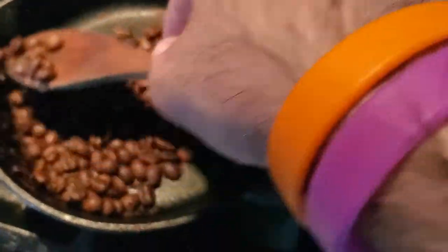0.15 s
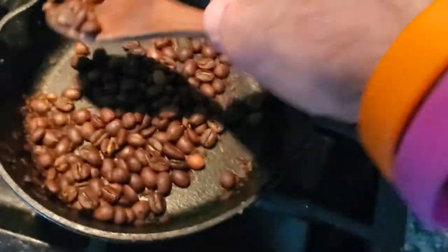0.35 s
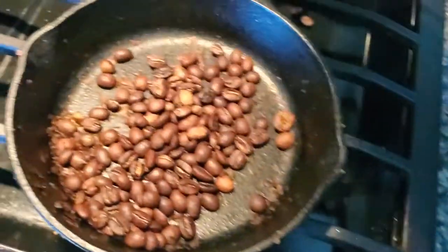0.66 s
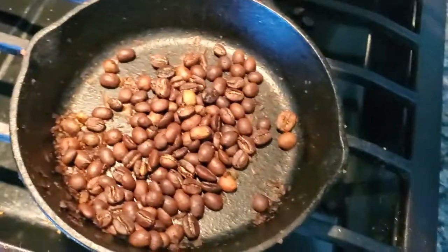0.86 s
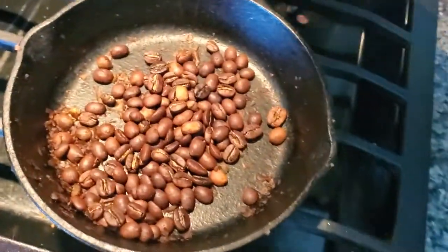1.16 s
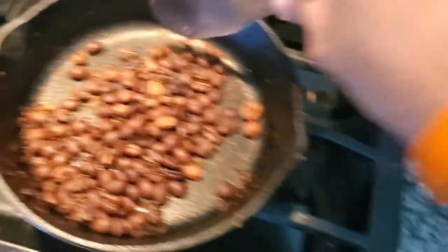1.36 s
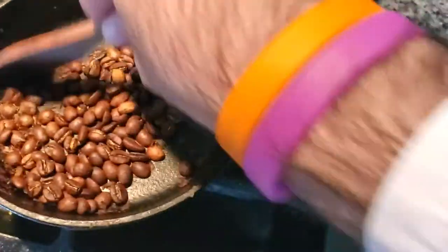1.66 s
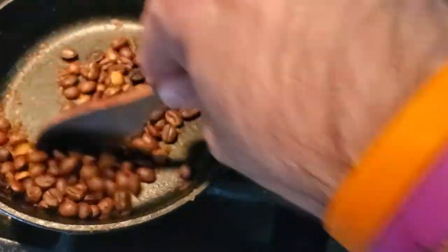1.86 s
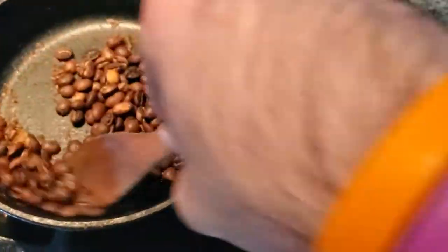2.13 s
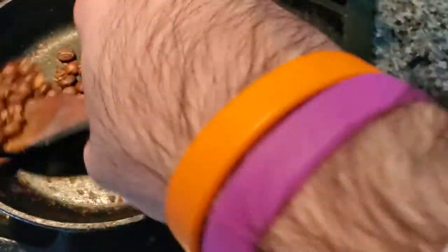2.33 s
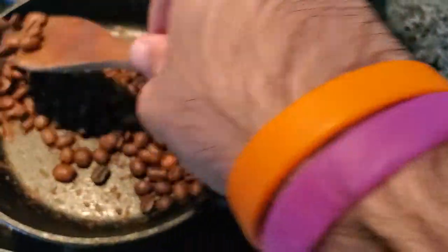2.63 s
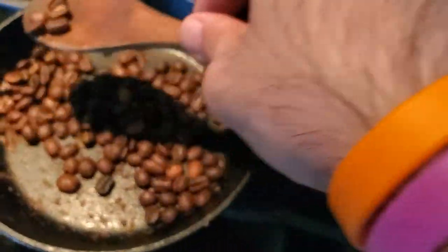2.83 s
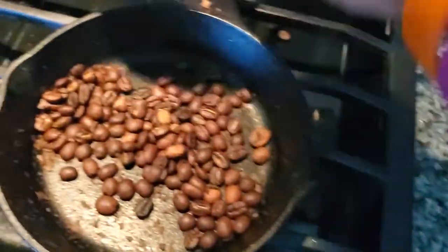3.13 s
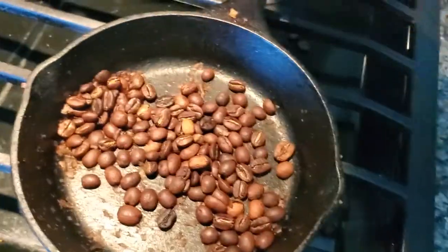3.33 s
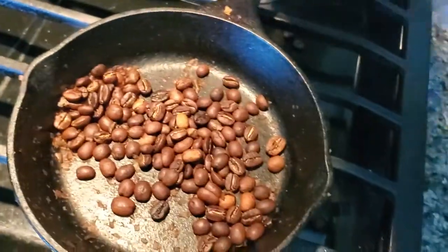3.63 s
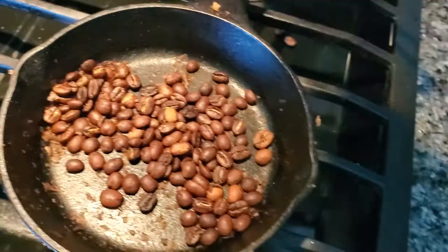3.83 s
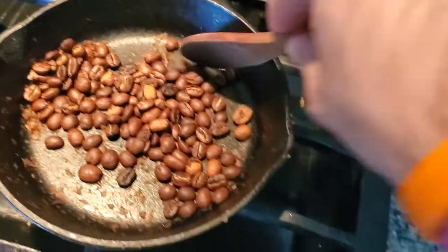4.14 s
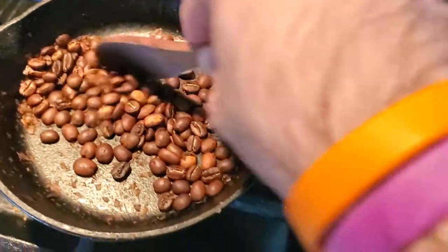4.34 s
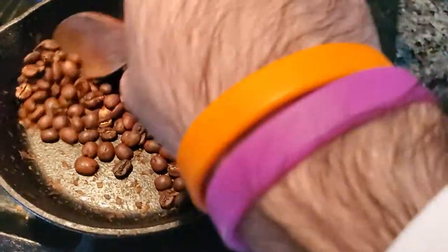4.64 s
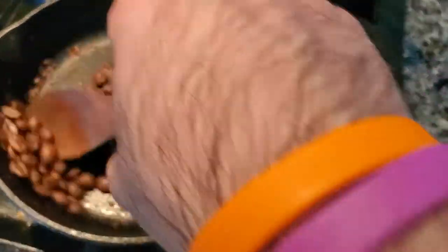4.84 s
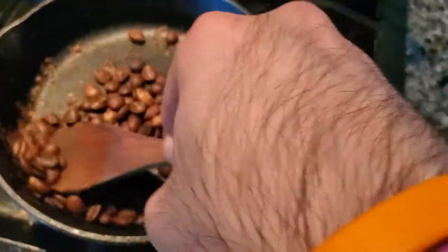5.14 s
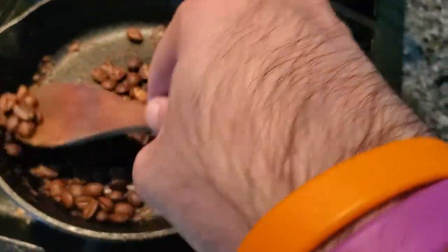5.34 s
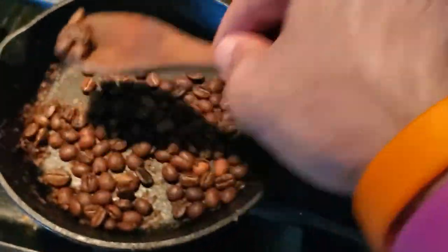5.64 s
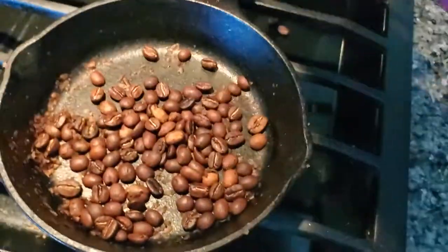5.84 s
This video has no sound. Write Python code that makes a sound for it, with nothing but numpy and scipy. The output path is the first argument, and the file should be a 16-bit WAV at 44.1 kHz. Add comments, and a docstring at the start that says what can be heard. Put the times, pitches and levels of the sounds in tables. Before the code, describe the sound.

Close stereo sound of coffee beans stirred in a cast iron pan on a kitchen stove. A faint trickle of beans opens, then a wooden tool clatters quickly on the metal grate. A strong stir follows with dense rattling, scraping and knocks, fading into loose bean ticks. After a pause and another clatter, a second shorter stir comes, over faint hum, low room noise and airy hiss.

```python
"""Stirring coffee beans in an iron pan

A wooden spatula scrapes and knocks in a cast iron pan: beans are clumps of short pings, dragging is
shaped noise, and knocks are decaying noise bursts that excite the damped resonant modes of the pan.
Between strokes the spatula clatters against the iron grate, which has shorter modes of its own.
Sparse reflections follow; room noise, a wavering hum and a faint treble hiss lie underneath."""
import sys
import numpy as np
from scipy import signal
from scipy.io import wavfile
from scipy.ndimage import uniform_filter1d

SR = 44100
rng = np.random.default_rng(int(sys.argv[2]) if len(sys.argv) > 2 else 0)


def nominal_scale(level):
    """Amplitude ratio for a level in decibels (scalar or array-like)."""
    x = np.asarray(level, float) / 20
    return 10 ** x


def transcribe(signal):
    """Save signal, clipped to [-1, 1], as a 16-bit WAV file at the path in sys.argv[1]."""
    frames = np.atleast_2d(signal).T
    limited = np.clip(frames, -1, 1)
    pcm = np.round(limited * 32767).astype(np.int16)
    wavfile.write(sys.argv[1], SR, pcm)


N = 263718  # length in samples

# Spectrum of the low room noise. Each row: frequency in Hz, relative density in dB per Hz.
ROOM_SPECTRUM = [(12, -52), (20, -31), (48, -1.5), (185, -9), (209, -11.5), (242, -0.5), (332, -14),
                 (384, -3), (784, -15), (1120, -26), (2590, -45), (3000, -38.5), (3900, -77.5),
                 (6600, -120)]
# Partials of the hum. Each row: frequency in Hz, relative level in dB.
HUM_PARTIALS = [(59.2, -66), (120.0, -66), (240.5, -69), (483.0, -77)]
# Swelling and sinking of the treble hiss. Each row: time in seconds, level in dB.
HISS_SWELL = [(0, -60), (.4, -79), (.7, -70), (.95, -56), (1.2, -59.5), (1.4, -80.5), (2.5, -69),
              (3.1, -83.5), (3.45, -62), (3.8, -68.5), (4.1, -79), (5.1, -62), (5.65, -83), (5.98, -68.5)]
# Spectrum of the treble hiss. Each row: frequency in Hz, relative density in dB per Hz.
HISS_SPECTRUM = [(880, -42), (1500, -19), (2090, -4), (3970, -0.5), (7250, -3.5), (8260, 1), (15100, 1),
                 (16000, 7), (16500, -24)]
# Left-right likeness of the noises. Each row: frequency in Hz, correlation from 0 to 1.
LIKENESS = [(30, 0.74), (250, 0.9), (600, 0.46), (2000, 0.043), (16000, .2)]
# Spatula bounces on the grate. Each row: start in seconds, dull crack in relative dB,
# bright crack in relative dB, decay constant of the crack in seconds.
GRATE_BOUNCES = [(0.956, -60, -75, 0.004), (0.9865, -14.5, -27, 0.011), (0.9907, -31.5, -17, 0.0051),
                 (1.009, -22.5, -22, 0.0081), (1.0216, -13, -22, 0.0015), (1.068, -29, -30, 0.018),
                 (1.0745, -28, -22, 0.008), (1.087, -41, -27.5, 0.019), (1.11, -30, -30.5, 0.0083),
                 (1.3603, -45, -72, 0.07), (3.4985, -29, -27, 0.015), (3.5352, -16, -22, 0.0097),
                 (3.553, -26, -13, 0.003), (3.599, -30.5, -46, 0.0057), (3.6217, -26.5, -39, 0.035),
                 (3.825, -52, -72, 0.02), (4.0, -68, -85, 0.04)]
# Modes of the grate. Each row: frequency in Hz, relative level in dB, decay by 60 dB in seconds.
GRATE_MODES = [(1920, -9, .03), (1650, -19, .02), (3350, -12, .02), (3700, -6, .02), (3815, -2, .03),
               (3880, -6, .045), (4000, -6, .02), (6045, -12, .05), (6700, -6, .02), (8400, -8, .015),
               (7600, -8, .02), (10850, -4, .015), (11310, -6, .025), (11640, -6, .02), (12700, -4, .012)]
# The blade dragging on the bottom, one list a passage. Each row: time in seconds,
# scrape rumble in dB, deep shudder of the stove in dB.
DRAG_STROKES = [
    [(.06, -72, -70), (.1, -56, -57), (.14, -66, -66), (.25, -63, -64), (.3, -72, -72)],
    [(1.43, -75, -66), (1.466, -47, -62), (1.52, -47, -57), (1.66, -47, -56), (1.78, -52, -66),
     (1.9, -55, -54), (1.96, -49, -60), (2.07, -55, -54), (2.168, -47, -54), (2.234, -50, -61),
     (2.312, -48, -56), (2.5, -68, -60), (2.65, -63, -56), (2.75, -70, -66)],
    [(4.12, -72, -70), (4.18, -49, -60), (4.3, -52, -62), (4.5, -66, -66), (4.562, -51, -60),
     (4.65, -46, -62), (4.776, -50, -55), (4.864, -58, -58), (5.1, -68, -66)],
]
# Spectrum of wood dragged over iron. Each row: frequency in Hz, relative density in dB per Hz.
SCRAPE_SPECTRUM = [(150, -22), (240, -2), (280, -5), (330, 1), (420, -5), (485, 1), (560, -4), (775, -9),
                   (1500, -14), (1950, -42), (3300, -120)]
# Spectrum of the stove's shudder. Each row: frequency in Hz, relative density in dB per Hz.
SHUDDER_SPECTRUM = [(25, -16), (60, 0), (120, -5), (160, -25), (400, -90)]
# Spatula strokes, one list a stroke. Each row: time in seconds, push of the spatula through
# the heap in relative dB, loose beans rolling in relative dB.
STIR_STROKES = [
    [(0, -83, -59.5), (0.08, -65, -59), (0.14, -73, -57.5), (0.22, -69, -64.5), (0.3, -78, -65.5),
     (0.4, -90, -85), (0.45, -105, -70), (0.6, -92, -97)],
    [(1.44, -67, -91), (1.47, -49, -53), (1.55, -47, -52.5), (1.65, -41, -44), (1.695, -60, -58)],
    [(1.695, -36.5, -52), (1.76, -39.5, -39), (1.88, -48.5, -34.5), (1.95, -41.5, -35), (2.09, -51, -46.5),
     (2.16, -42, -37.5), (2.24, -48.5, -48.5), (2.36, -51, -43), (2.43, -71, -54.5)],
    [(2.43, -72, -62), (2.58, -83, -56), (2.63, -76, -42), (2.68, -80, -55.5), (2.74, -75, -44.5),
     (2.79, -74, -53), (2.85, -87, -50), (3.0, -73, -61.5), (3.1, -90.5, -97)],
    [(4.14, -70.5, -98.5), (4.2, -49, -62), (4.27, -56, -46), (4.31, -37.5, -36), (4.36, -56.5, -45.5),
     (4.43, -74, -71), (4.54, -68, -53.5)],
    [(4.54, -80, -64), (4.56, -44.5, -46), (4.67, -50, -51), (4.75, -45, -44), (4.83, -56, -54.5),
     (4.9, -60.5, -56), (4.99, -52, -60), (5.06, -72, -71), (5.12, -63, -70), (5.18, -68, -72)],
    [(5.18, -78, -63.5), (5.34, -91, -73.5), (5.45, -77.5, -54.5), (5.53, -80.5, -81.5), (5.65, -92, -92)],
]
# Single ticks and knocks in the pan. Each row: start in seconds, dull crack in relative dB,
# bright crack in relative dB, ring in relative dB.
PAN_KNOCKS = [(0.0252, -64, -43, -60.5), (0.1257, -31, -50, -58), (0.1439, -60, -38, -63.5),
              (0.178, -62, -42, -62), (0.193, -56, -37, -59.5), (0.2164, -59, -37, -55),
              (0.258, -61, -41, -58), (0.286, -64, -45, -64), (0.325, -52, -50, -60),
              (0.4405, -66, -52, -68), (1.4475, -48.5, -24, -50.5), (1.4604, -33, -36.5, -10.5),
              (1.575, -23, -36, -25), (1.5909, -26, -41.5, -29), (1.6327, -22.5, -48.5, -37.5),
              (1.701, -16, -22, -37.5), (1.7044, -17.5, -18, -36), (1.712, -19.5, -25.5, -35),
              (1.751, -23.5, -44, -34), (1.7905, -22, -30.5, -29), (1.8687, -18, -30.5, -37),
              (1.934, -40.5, -24.5, -45), (1.9473, -19.5, -24, -21.5), (2.0167, -13.5, -23.5, -35.5),
              (2.028, -35.5, -32.5, -33), (2.0668, -6, -29, -28.5), (2.3099, -49, -29, -55),
              (2.4562, -36, -42, -42), (2.5171, -34, -42, -54.5), (2.551, -58, -44, -55),
              (2.59, -55, -40, -58), (2.603, -32.5, -36, -42), (2.6863, -44, -32, -40),
              (2.72, -56, -38, -55), (2.795, -50, -30, -43), (4.146, -41, -34, -53), (4.1789, -7, -35, -14),
              (4.2886, -22, -29, -32), (4.4085, -27.5, -41, -33), (4.551, -22, -39.5, -33),
              (4.559, -13.5, -38, -30), (4.5761, -14.5, -49, -46), (4.6, -17, -39.5, -37),
              (4.6284, -21.5, -37, -27), (4.7009, -33, -35, -38), (4.9131, -38, -50, -58),
              (4.9605, -36, -50, -58), (4.9725, -34, -48, -58), (5.0289, -38, -55, -62),
              (5.1062, -48, -60, -66), (5.1955, -62, -50, -64), (5.3187, -50, -64, -68),
              (5.3586, -56, -52, -68), (5.4274, -58, -44, -62), (5.2254, -64, -52, -58),
              (5.3873, -35, -46, -57), (5.5132, -63.5, -44, -81)]
# Modes of the pan. Each row: frequency in Hz, relative level in dB, undamped decay by 60 dB in seconds.
PAN_MODES = [(482, -19, .15), (904, -22, .12), (1533, -12.5, .24), (1652, -8, .08), (2512, -8, .9),
             (3089, -.5, .17), (3103, -3, .17), (3161, -12, .3), (3885, -3.5, .13), (4727, 1.5, .18),
             (5160, -13, .1), (5338, -3, .16), (5810, -5, .13), (6405, -4, .15), (6990, -2, .14),
             (7212, -5, .2), (7800, -9, .1), (8090, -6, .09), (9000, -5, .16), (9350, -8, .15),
             (9660, -8, .12), (10900, -12, .08), (11310, -11, .1)]


def evened(x):
    """Normalisation: scales a signal to an rms of 1."""
    return x / np.sqrt(np.mean(x ** 2) + 1e-20)


def read(points, hz):
    """Interpolation: reads a spectrum table on a logarithmic frequency axis."""
    f, value = np.transpose(points)
    return np.interp(np.log(hz + 1), np.log(f + 1), value)


def band(x, lo_hz, hi_hz):
    """Causal band-pass: a Butterworth filter keeps one frequency range."""
    edges = [lo_hz, min(hi_hz, SR * .45)]
    return signal.sosfilt(signal.butter(2, edges, "band", fs=SR, output="sos"), x)


def place(x, db, count):
    """Stereo localisation: louder on the left by db, and earlier there by count samples."""
    sides = nominal_scale([db / 2, -db / 2])[:, None]
    return sides * [x[0], np.roll(x[1], count)]


def noise(spectrum, patchy_db, near=0):
    """Random-phase synthesis: short-time spectra with drifting patches give stereo noise of rms 1."""
    hz = np.fft.rfftfreq(1024, 1 / SR)
    a, b, c, d, patches = rng.standard_normal((N // 512 + 3, 513, 5)).T
    patches = uniform_filter1d(patches, size=8, axis=0)  # over frequency
    patches = evened(uniform_filter1d(patches, size=5, axis=1))  # over time
    same = np.clip(near + (1 - near) * read(LIKENESS, hz), -1, 1)[:, None]
    left = a + 1j * b
    right = same * left + np.sqrt(1 - same ** 2) * (c + 1j * d)
    z = np.array([left, right]) * nominal_scale(read(spectrum, hz)[:, None] + patchy_db * patches)
    return evened(signal.istft(z, window="cosine", nperseg=1024, noverlap=512)[1][:, :N])


def room():
    """Broadband ambience: steady low noise shaped by its spectrum."""
    return nominal_scale(-58) * noise(ROOM_SPECTRUM, patchy_db=1.5)


def hum():
    """Superposition of partials: each sine wavers slowly in level and phase."""
    t = np.arange(N) / SR
    total = np.zeros(N)
    for hz, db in HUM_PARTIALS:
        waver = np.interp(t, np.linspace(0, t[-1], 50), rng.standard_normal(50))
        total += nominal_scale(db + 3.5 + 2.2 * waver) * np.sin(2 * np.pi * hz * t + 0.6 * waver)
    return total


def hiss():
    """Amplitude modulation: a slow envelope makes treble noise swell and sink."""
    envelope = nominal_scale(np.interp(np.arange(N) / SR, *np.transpose(HISS_SWELL)))
    return envelope * noise(HISS_SPECTRUM, patchy_db=4.0)


def background():
    """Superposition of independent sources: room noise and hum, slightly to the left, and the hiss."""
    return place(hum() + room(), 1.3, count=0) + hiss()


def kitchen(x):
    """Reverberation: sparse reflections, other ones for each port, lasting longest near 4 kHz."""
    taps = np.zeros((2, SR // 2))
    grid = np.arange(60, SR // 2 - 20, 20)
    at = grid + rng.integers(0, 20, (2, len(grid)))
    np.put_along_axis(taps, at, rng.choice([-1., 1.], at.shape), 1)
    hz, t, z = signal.stft(taps, SR, nperseg=256)
    t60 = read([(500, 0.13), (4000, 0.33), (14000, 0.16)], hz)[:, None]  # Hz, seconds
    tail = signal.istft(z * nominal_scale(-60 * t / t60), SR, nperseg=256)[1]
    tail = tail / np.linalg.norm(tail[0])
    return signal.fftconvolve(x.mean(0)[None], tail, axes=1)[:, :N]


def mode(push, hz, t60, grip):
    """Damped resonance: one complex pole, run block by block, decays faster where grip exceeds 1."""
    touch_s, grip_hz = 0.0015, 4530  # the ring builds up over the contact; grip damps less below grip_hz
    touch = np.hanning(round(touch_s * SR))
    contact = touch / touch.sum() * np.exp(2j * np.pi * hz * np.arange(len(touch)) / SR)
    push = signal.oaconvolve(push, contact)[:N]
    decay = np.log(1000) / max(t60, .02)
    state, out = [0j], []
    for part, hold in zip(np.array_split(push, len(grip)), grip):
        damping = (1 + (hold - 1) * min(hz / grip_hz, 1) ** 2) * decay
        pole = np.exp((2j * np.pi * hz - damping) / SR)
        tone, state = signal.lfilter([1], [1, -pole], part + 0j, zi=state)
        out.append(tone)
    return np.concatenate(out)


def ring(modes, s, low_db, high_db, drive, grip, spread_db, turn, corner_hz, soft_db):
    """Modal excitation: each blow lands on its own spot and wakes modes unevenly; drive shakes them all."""
    wander_depth_db, wander_per_s = 4.5, 20  # the response of each mode to the drive wanders
    out, at = np.zeros((2, N)), np.round(s * SR).astype(int)
    spot = spread_db * rng.standard_normal((len(at), len(modes)))
    for (hz, db, t60), spot_db in zip(modes, spot.T):
        hard = hz ** 2 / (hz ** 2 + corner_hz ** 2)  # high modes follow high_db, low modes low_db
        knots = rng.standard_normal(200)
        wander = np.interp(np.arange(N) / SR * wander_per_s, np.arange(len(knots)), knots)
        push = np.roll(drive, rng.integers(-200, 200))
        push = push * nominal_scale(wander_depth_db * wander + (1 - hard) * soft_db)
        np.add.at(push, at, nominal_scale((1 - hard) * low_db + hard * high_db + spot_db))
        angle = turn * rng.choice([-1, 1])  # a mode reaches the two ports with different phase
        tone = nominal_scale(db) * mode(push, hz, t60, grip)
        out += np.cos(angle) * tone.imag + np.sin([[angle], [-angle]]) * tone.real
    return out


def cracks(s, db, bright_db, length):
    """Impact noise: exponentially decaying bursts in two trains, partly unlike at the two ports."""
    body, bright = np.zeros((2, 2, N + 4096))
    t = np.arange(4096) / SR
    for k, start in enumerate(np.round(s * SR).astype(int)):
        near, left, right = rng.standard_normal((3, 4096)) * np.exp(-t / max(length[k], 1e-4))
        own = np.array([left, right])
        body[:, start:start + 4096] += nominal_scale(db[k]) * (near + 0.034 * own)
        bright[:, start:start + 4096] += nominal_scale(bright_db[k]) * (near + 1.6 * own)
    return body[:, :N], bright[:, :N]


def grate():
    """Repeated impact: each bounce of the spatula is a dense chatter that rings the bars."""
    s, db, bright_db, length = np.transpose(GRATE_BOUNCES)
    body, chatter = cracks(s, db, bright_db, length)
    body, chatter = band(body, 1650, 7100), band(chatter, 7000, 16000)
    drive = nominal_scale(-27.0) * (body + chatter).mean(0)
    bars = ring(GRATE_MODES, s, db - 7.0, bright_db - 6.0, drive, [1],
                spread_db=2.5, turn=0.7, corner_hz=6500, soft_db=-.3)
    return place(bars + nominal_scale(-15) * body + chatter, -2.5, count=1)


def strokes(table):
    """Envelope interpolation: the columns of a stroke table at every sample in dB, silent between."""
    t, out = np.arange(N) / SR, np.full((2, N), 1e-8)
    for rows in table:
        s, *columns = np.transpose(rows)
        inside = (t >= s[0]) & (t < s[-1])
        out[:, inside] = nominal_scale([np.interp(t[inside], s, c) for c in columns])
    return 20 * np.log10(np.abs(uniform_filter1d(out, size=200, axis=1)) + 1e-8)


def drag():
    """Sliding friction: the blade on the bottom gives a scrape rumble and a deep shudder of the stove."""
    rumble, shudder = nominal_scale(strokes(DRAG_STROKES))
    scrape = rumble * noise(SCRAPE_SPECTRUM, patchy_db=2.0, near=.6)
    return scrape + shudder * noise(SHUDDER_SPECTRUM, patchy_db=1.5, near=.7)


def pan_knocks():
    """Impact spectrum: light knocks are single beans and crack higher; heavy ones are wood on iron."""
    s, db, bright_db, ring_db = np.transpose(PAN_KNOCKS)
    light = 1 / (1 + np.exp((db + 28) / 5))  # share of power: half at -28 dB, with a 5 dB span
    body, snap = cracks(s, db + 10 * np.log10(1 - light), bright_db, np.full(len(s), .0013))
    tick, heavy = cracks(s, db + 10 * np.log10(light), ring_db, np.full(len(s), .0025))
    knocks = nominal_scale(4.0) * band(body, 1920, 4200) + nominal_scale(.6) * band(snap, 5000, 22000)
    knocks += nominal_scale(3.0) * band(tick, 3300, 5400)
    thud = nominal_scale(-7.0) * band(body, 950, 2200) + nominal_scale(-12.0) * band(heavy.mean(0), 300, 1900)
    return knocks + thud


def sloped(db, slope, offset_db):
    """Power law: scales a level about a pivot of -50 dB, then offsets it, and returns the gain."""
    return nominal_scale(-50 + slope * (db + 50) + offset_db)


def heap_gain(push_db):
    """Granular agitation: pushing the heap sets the gain of the dull rattle."""
    return nominal_scale(push_db - 3)


def pan_ring():
    """Forced and struck vibration: rolling beans and knocks ring the iron, and the moving heap damps it."""
    push_db, roll_db = strokes(STIR_STROKES)
    s, _, bright_db, ring_db = np.transpose(PAN_KNOCKS)
    rattle = heap_gain(push_db)
    rolling = sloped(roll_db, 0.96, -22)
    sizes = nominal_scale(3.47 * np.minimum(rng.exponential(1, N), 4))
    grit = sizes * (rng.random(N) < 600 / SR) * rng.choice([-1, 1], N)  # about 600 impulses per second
    grip = 1 + np.minimum(rattle[::2048] / nominal_scale(-53), 4.5)
    drive = rolling * evened(grit) / (1 + rattle / nominal_scale(-47.0))  # the heap also muffles the rolling
    return ring(PAN_MODES, s, ring_db - 8.0, bright_db - 6.5, drive, grip,
                spread_db=4.5, turn=0.3, corner_hz=4420, soft_db=-7.0)


def scatter(s, db):
    """Exponential relaxation: beans thrown up by each knock settle again."""
    scatter_db, settle_s = -15.5, 0.02
    kicks = np.zeros(N)
    np.add.at(kicks, np.round(s * SR).astype(int), nominal_scale(db + scatter_db))
    return signal.lfilter([1], [1, -np.exp(-1 / (SR * settle_s))], kicks)


def collisions(level, clumps, lo_hz, hi_hz, per_s, spread_db, cycles):
    """Random point process: clumped short pings of eight pitches, most small and a few large."""
    out, t = np.zeros((2, N)), np.arange(300) / SR
    size = nominal_scale(spread_db * np.minimum(rng.exponential(1, N), 4))
    size = size * (rng.random(N) < clumps * per_s / SR)
    kind = rng.integers(0, 8, N)
    for k, hz in enumerate(np.geomspace(lo_hz, hi_hz, 8)):
        ping = evened(np.cos(2 * np.pi * hz * t) * t * np.exp(-t * hz / cycles))  # soft start
        clicks = signal.oaconvolve(size * (kind == k), ping)[:N]
        out += place([clicks, clicks], 4 * rng.standard_normal(), count=rng.integers(-3, 4))
    return level * evened(out)


def beans():
    """Granular collision: the pushed heap rattles dully and crunches, loose beans rattle brightly."""
    push_db, roll_db = strokes(STIR_STROKES)
    s, _, bright_db, _ = np.transpose(PAN_KNOCKS)
    rattle = heap_gain(push_db)
    bright = sloped(roll_db, 0.94, -9) + scatter(s, bright_db)
    clumps = nominal_scale(5.2 * evened(uniform_filter1d(rng.standard_normal(N), size=500)))
    low = collisions(rattle, clumps, 2300, 4800, per_s=1300, spread_db=3.5, cycles=0.48)
    high = collisions(bright, clumps, 9500, 14500, per_s=3800, spread_db=4.0, cycles=1.2)
    crunch = collisions(rattle * nominal_scale(-3.5), clumps, 4900, 7600, per_s=1800, spread_db=5.0, cycles=1.6)
    return low + high + crunch


def pan():
    """Superposition at the pan: ring, knocks and beans lie to the left, the drag nearer the middle."""
    return place(pan_ring() + pan_knocks() + beans(), 3.6, count=3) + place(drag(), 1.4, count=1)


def scene():
    """Direct and reflected sound: the stove, its reflections and the background add up."""
    stove = pan() + grate()
    return stove + nominal_scale(-5.0) * kitchen(stove) + background()


def band_limit(x):
    """A steep low-pass at the top of the band."""
    return signal.sosfilt(signal.butter(12, 17000, fs=SR, output="sos"), x)


def record(dry):
    """Band limitation: a linear-phase low-pass at 15.8 kHz bounds the spectrum of the mix."""
    lowpass = signal.firwin(255, 15800, window=("kaiser", 5), fs=SR)
    limited = signal.oaconvolve(dry, lowpass[None], "same")
    return band_limit(limited)


dry = scene()
out = record(dry)
transcribe(out)
```